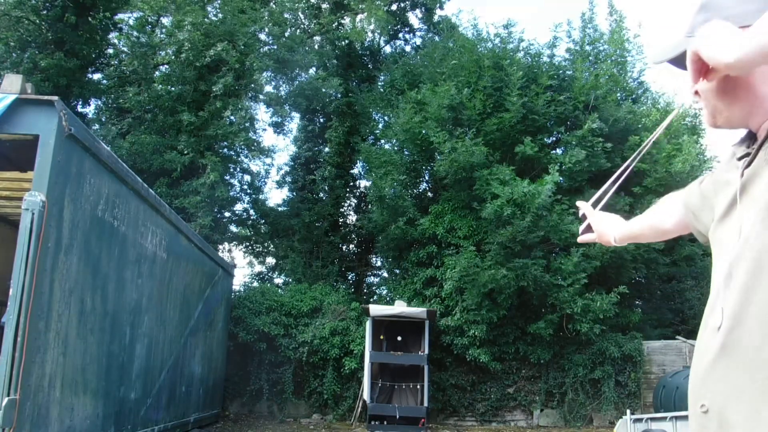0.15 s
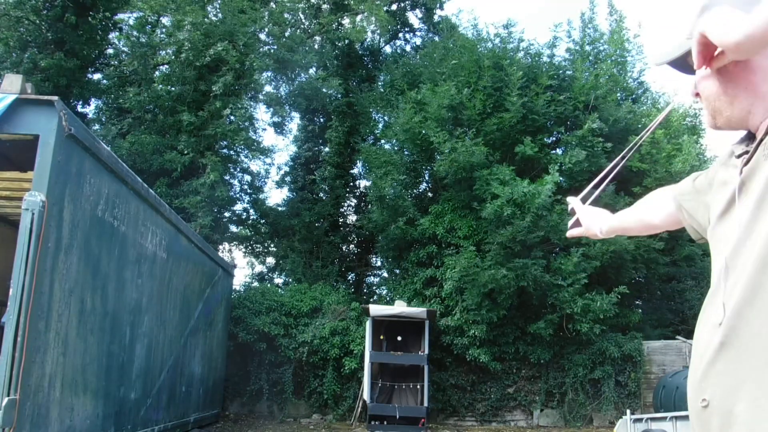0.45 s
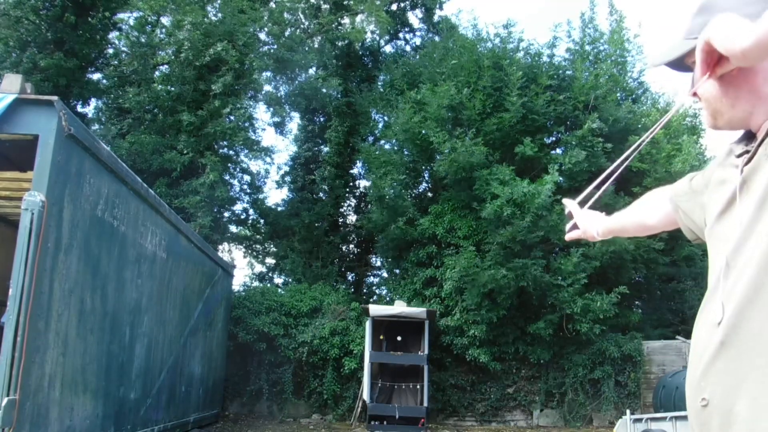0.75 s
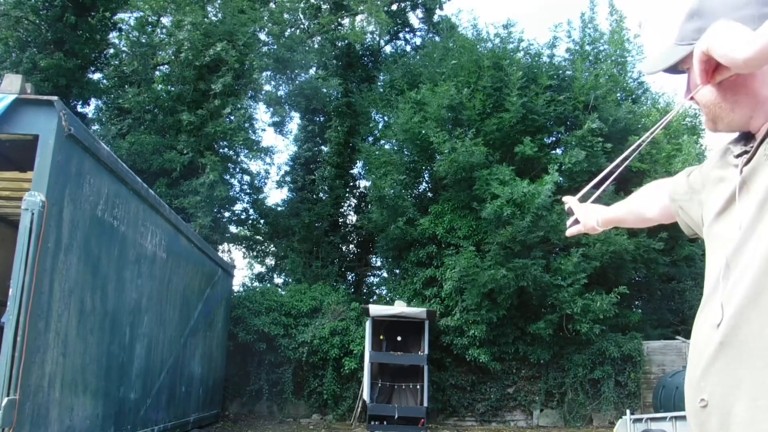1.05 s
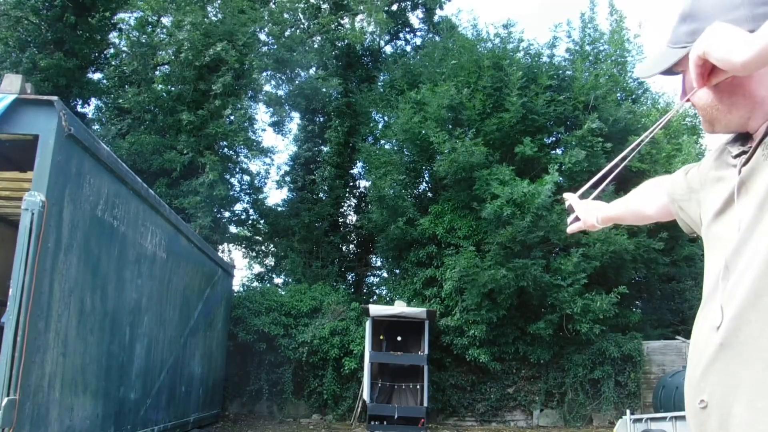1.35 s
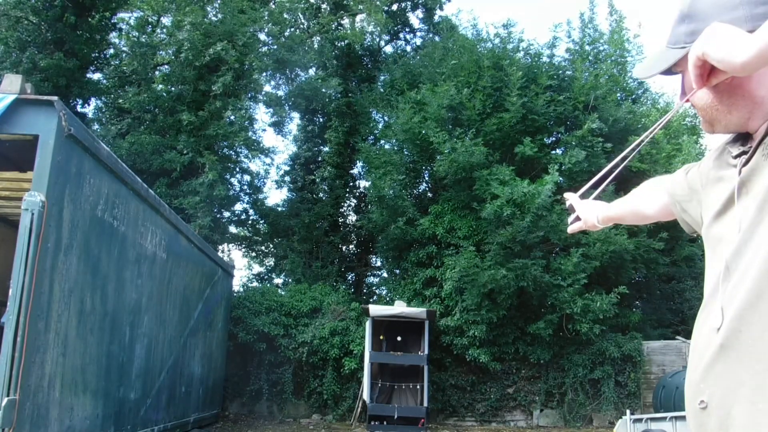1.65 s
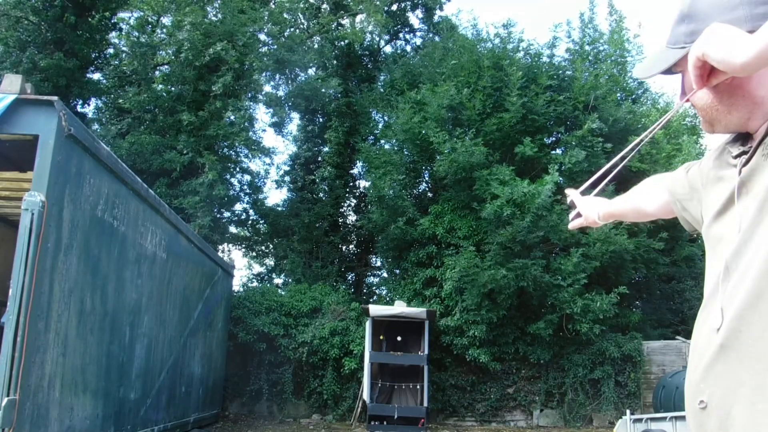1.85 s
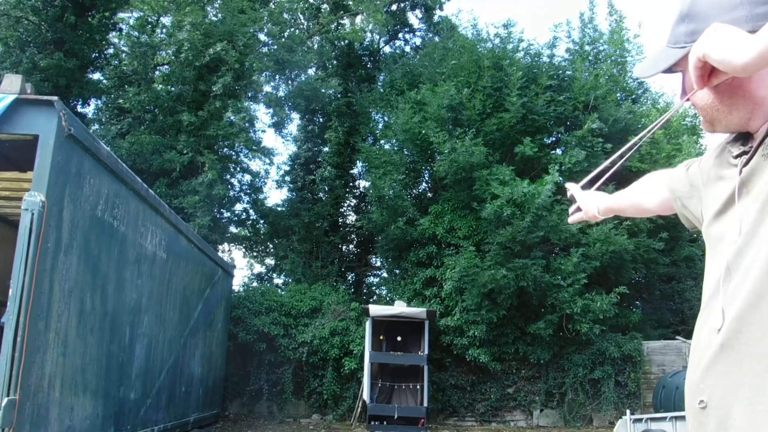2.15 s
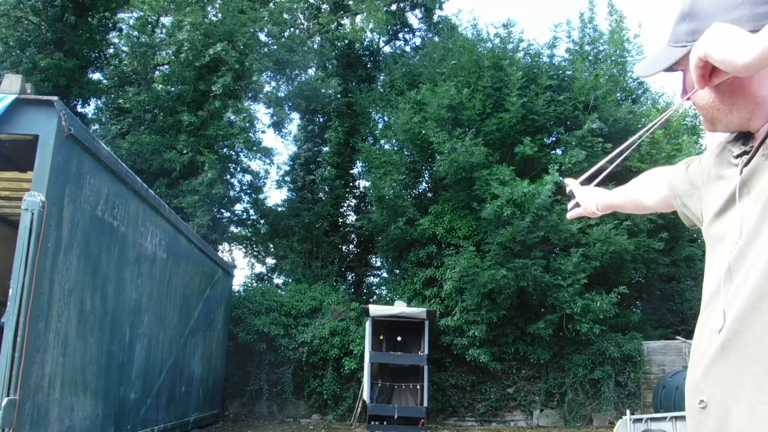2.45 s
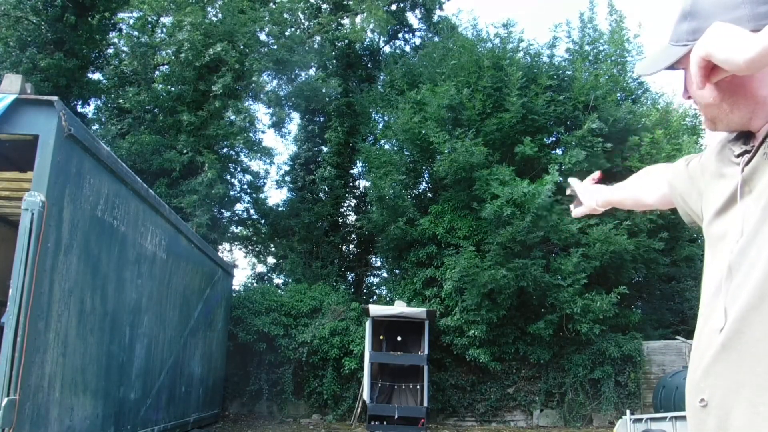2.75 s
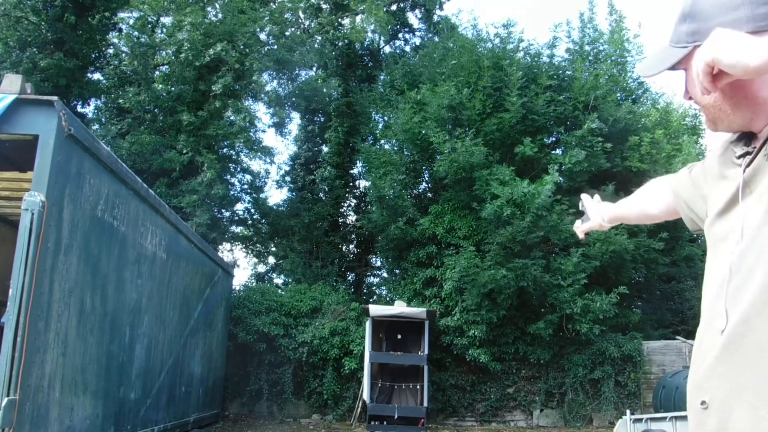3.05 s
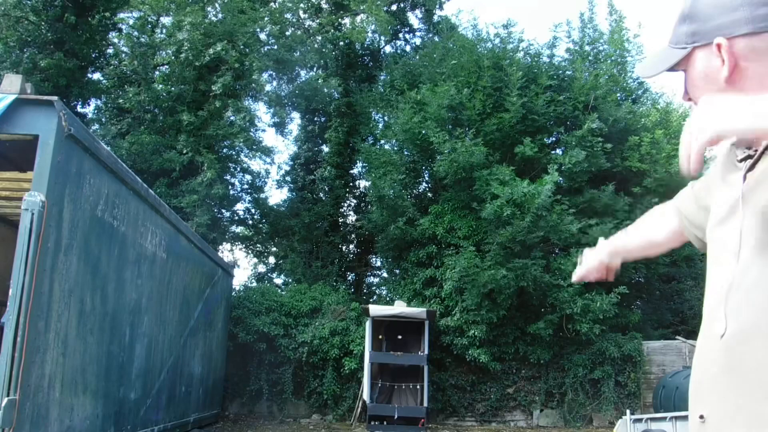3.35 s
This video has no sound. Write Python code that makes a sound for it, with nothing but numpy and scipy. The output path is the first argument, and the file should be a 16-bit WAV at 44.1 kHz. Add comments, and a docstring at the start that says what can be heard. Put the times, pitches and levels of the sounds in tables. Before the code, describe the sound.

Slingshot shot with a sharp snap, a hit and a ringing clank, amid garden birdsong.

```python
"""Slingshot in a garden

The drawn slingshot ticks; its bands crack and flutter. The steel ball smacks into a catch box, then
drops and rings it. A container wall and trees echo the blows, which overload the microphone.
A small bird chirps throughout in rustling trees, over a faint whir, whine and rumble."""
import sys
import numpy as np
from scipy import signal
from scipy.fft import rfft, irfft
from scipy.io import wavfile
from scipy.ndimage import uniform_filter1d

SR = 44100
rng = np.random.default_rng(int(sys.argv[2]) if len(sys.argv) > 2 else 0)


def file_out(sig):
    """Save sig as 16-bit WAV at sys.argv[1]."""
    # one column per channel
    cols = np.atleast_2d(sig).T
    # limit, then scale
    lim = np.clip(cols, -1, 1)
    pcm = np.round(lim * 32767).astype(np.int16)
    wavfile.write(sys.argv[1], SR, pcm)


N = 154350
T = np.arange(N) / SR


def undb(db):
    """Decibels to gain."""
    return 10 ** (np.asarray(db) / 20)


def unit(x):
    """Scale to rms 1."""
    return x / np.sqrt(np.mean(x ** 2) + 1e-20)


def curve(points):
    """Gain along (time [s], level [dB]) points, silent outside them."""
    return undb(np.interp(T, *np.array(points).T, left=-200, right=-200))


def colour(x, points):
    """Minimum-phase filter through (frequency [Hz], gain [dB]) points."""
    hz, db = np.array(points).T
    size = 4096
    bins_hz = np.maximum(np.arange(size // 2 + 1) * SR / size, 1)
    cepstrum = irfft(np.log(undb(np.interp(np.log(bins_hz), np.log(hz), db))))
    cepstrum[1:size // 2] *= 2
    cepstrum[size // 2 + 1:] = 0
    return signal.fftconvolve(x, irfft(np.exp(rfft(cepstrum))))[:N]


def lowpass(x, hz, order=2):
    """Butterworth low-pass."""
    return signal.sosfilt(signal.butter(order, hz, fs=SR, output="sos"), x)


def band(hz, width_hz):
    """Noise passed twice through one resonance, rms 1."""
    b, a = signal.iirpeak(hz, hz / width_hz, fs=SR)
    return unit(signal.lfilter(b, a, signal.lfilter(b, a, rng.standard_normal(N))))


def walk(rate_hz):
    """Smooth random drift, rms 1."""
    hold = int(SR / rate_hz)
    steps = np.repeat(rng.standard_normal(N // hold + 1), hold)[:N]
    return unit(uniform_filter1d(steps, hold))


def fade(start_s, t60_s):
    """Sudden onset, exponential decay."""
    return (T >= start_s) * undb(-60 * np.maximum(T - start_s, 0) / t60_s)


def bursts(contacts, spectrum):
    """Short contacts exciting dense, damped resonances, as decaying noise."""
    out = 0
    for start_s, db, t60_s in contacts:
        envelope = fade(start_s, t60_s)
        burst = unit(colour(envelope * rng.choice([-1., 1.], N), spectrum))
        out = out + undb(db) * np.sqrt(np.mean(envelope ** 2)) * burst
    return out


def swell(centre_s, half_width_s, db):
    """Gaussian gain envelope."""
    return undb(db) * np.exp(-((T - centre_s) / half_width_s) ** 2)


def garden():
    """Steady leaf noise with soft swells of rumble, hiss and rustle."""
    # leaf noise spectrum (frequency [Hz], gain [dB])
    leaf_colour = [(15, -33), (25, -9), (64, -9.5), (117, -15), (476, -12.5), (624, -10), (796, -9.5),
                   (936, -9), (1100, -9), (1440, -5.5), (1890, -12.5), (3920, -9), (4370, -6.5),
                   (6920, -17), (8140, -23.5), (9570, -24), (16000, -30)]
    # low rumbles (time [s], half width [s], level [dB])
    rumbles = [(.22, 0.17, -62), (.7, 0.14, -62), (1.025, .025, -57.5), (3.12, 0.032, -62)]
    # high hisses (time [s], half width [s], level [dB])
    hisses = [(.67, 0.049, -62), (1.65, .04, -63), (2.71, .05, -63)]
    # midrange rustles (time [s], half width [s], level [dB], frequency [Hz])
    rustles = [(.4, 0.091, -58.5, 2050), (.9, 0.16, -54.5, 3970)]
    leaves = unit(colour(rng.standard_normal(N), leaf_colour)) * undb(-50.5 + 0.21 * walk(4.95))
    rumble = band(120, width_hz=200) * sum(swell(*row) for row in rumbles)
    hiss = band(10000, width_hz=7000) * sum(swell(*row) for row in hisses)
    rustle = sum(swell(*shape) * band(hz, hz * 0.35) for *shape, hz in rustles)
    return leaves + rumble + hiss + rustle


def whir():
    """Distant whir: wavering narrow-band noise."""
    # whir envelope (time [s], level [dB])
    levels = [(0, -64), (.2, -57), (.8, -58), (1.3, -55), (1.5, -60.5), (2.1, -61.5), (2.7, -63),
              (3.5, -72)]
    return band(1422, width_hz=183) * curve(levels) * undb(0.58 * walk(25.44))


def whine():
    """Thin, steady tones with slight pitch drift."""
    # whine tones (frequency [Hz], rms level [dB])
    tones = [(6845, -73.5), (6905, -71), (7420, -77)]
    return sum(undb(db) * np.sqrt(2) * np.sin(2 * np.pi * np.cumsum(hz + 6 * walk(30)) / SR)
               for hz, db in tones)


def bird():
    """Buzzy, slightly falling chirps, each blurred differently by moving leaves."""
    # bird chirps (time [s], length [s], level [dB], pitch [Hz])
    chirps = [(-.03, 0.044, -43, 5294), (0.194, 0.056, -43.5, 5370), (0.588, 0.046, -45, 5470),
              (.625, 0.076, -48.5, 4850), (0.764, 0.055, -44.5, 5330), (.80, .1, -49.5, 4840),
              (.938, 0.058, -44.5, 5320), (0.973, 0.051, -50.5, 4800), (1.103, 0.062, -45, 5550),
              (1.379, 0.061, -48, 5250), (1.664, 0.064, -45.5, 5500), (1.846, 0.046, -43.5, 5260),
              (2.027, 0.056, -44.5, 5360), (2.238, .06, -45, 5400), (2.475, .05, -45, 5050),
              (2.755, 0.06, -43.5, 5200), (3.235, 0.07, -48.5, 5430), (3.457, .05, -46, 5380)]
    trill_hz, depth_hz, wander_hz, fall_hz = 170.5, 660, 209.5, 150
    direct_gain, blur_t60_s = 0.58, 0.43
    trill = np.sin(2 * np.pi * np.cumsum(trill_hz * (1 + .25 * walk(200))) / SR)
    waver_hz = depth_hz * trill + wander_hz * walk(300)
    size = SR // 3
    t = T[:size]
    song = 0
    for k, (start_s, length_s, db, hz) in enumerate(chirps):
        progress = np.clip(t / length_s, 0, 1)
        pitch_hz = hz + waver_hz[k * size // 2:][:size] + fall_hz * (.5 - progress)
        envelope = np.minimum(1, np.minimum(20 * progress, 2 * (1 - progress)))
        chirp = np.sqrt(2) * envelope * np.sin(2 * np.pi * np.cumsum(pitch_hz) / SR)
        blur = unit(rng.standard_normal(size) * undb(-60 * t / blur_t60_s)) / np.sqrt(size)
        heard = direct_gain * chirp + signal.fftconvolve(chirp, blur)[:size]
        song = song + undb(db) * np.interp(T - start_s, t, heard, left=0, right=0)
    return lowpass(song, hz=6270, order=20)


def draw_ticks():
    """The drawn slingshot clicks faintly."""
    # clicks (time [s], level [dB], t60 [s], frequency [Hz])
    ticks = [(.683, -43, 0.057, 2220), (1.038, -26, 0.0057, 4400), (1.0405, -36, .005, 4000)]
    clicks = sum(undb(db) * fade(start_s, t60_s) * band(hz, hz * 0.76) for start_s, db, t60_s, hz in ticks)
    return lowpass(clicks, hz=5750, order=6)


def band_release():
    """The bands crack like a whip and flap as they go slack."""
    # band cracks (time [s], level [dB], t60 [s])
    cracks = [(2.7998, 4, 0.0029), (2.8142, -6, 0.0049), (2.8153, -1.5, 0.0039), (2.8219, 10.5, 0.0047),
              (2.8261, -2.5, .005), (2.8383, -8.5, 0.0078), (2.8452, -9, 0.0054)]
    # crack spectrum (frequency [Hz], gain [dB])
    crack_colour = [(100, -33), (900, -28.5), (1500, -21.5), (3200, -22.5), (4700, -1.5), (5900, -6.5),
                    (8000, -21), (11000, -32), (16000, -48.5)]
    # flapping rubber spectrum (frequency [Hz], gain [dB])
    rubber_colour = [(60, -28), (300, -23), (800, -9.5), (1600, -5), (2600, -2.5), (3400, -5.5),
                     (4800, 0.5), (7000, -3), (10000, -17), (12000, -17), (16000, -30)]
    # flapping envelope (time [s], level [dB])
    flutter = [(2.797, -42), (2.804, -30), (2.811, -27), (2.818, -14.5), (2.829, -21), (2.839, -16.5),
               (2.846, -36), (2.856, -53), (2.88, -72)]
    rubber = unit(colour(rng.standard_normal(N), rubber_colour))
    flaps = rubber * undb(4.5 * walk(rate_hz=980)) * curve(flutter)
    return bursts(cracks, crack_colour) + flaps


def shooter_foliage(shot):
    """Leaves scatter the shot into a diffuse tail."""
    # scatter envelope (delay [s], level [dB])
    tail = [(.003, 4.5), (.045, -10), (.062, 0.5), (.09, -9), (.16, -18.5), (.35, -36), (.8, -43)]
    # scatter spectrum (frequency [Hz], gain [dB])
    tail_colour = [(100, -4), (700, -5), (1500, -2), (3000, 3), (4800, -2.5), (7000, -4), (10000, -0.5),
                   (16000, -18.5)]
    response = colour(rng.standard_normal(N) * curve(tail), tail_colour)
    return undb(-19.5) * signal.fftconvolve(shot, unit(response) / np.sqrt(N))[:N]


def ball_strike():
    """The ball smacks into the box. Returns sound and onset [s]."""
    # ball impacts (time [s], level [dB], t60 [s])
    strikes = [(2.9657, 1, 0.015), (2.9686, 1.5, 0.014), (2.9720, -5, 0.014)]
    # impact spectrum (frequency [Hz], gain [dB])
    strike_colour = [(60, -44), (250, -33), (600, -31.5), (1000, -24), (1400, -12), (2200, -7.5),
                     (3600, -0.5), (4600, -3.5), (5800, -14), (8000, -20), (11000, -27), (16000, -34)]
    return bursts(strikes, strike_colour), strikes[0][0]


def box_foliage(start_s):
    """Leaves scatter one blow on the box into a noise tail; the treble dies first."""
    # scatter envelope (delay [s], level [dB])
    tail = [(.004, 6), (.012, 12), (.028, 8.5), (.045, 0.5), (.13, -3.5), (.2, -6), (.26, -11.5), (.8, -47)]
    # scatter spectrum (frequency [Hz], gain [dB])
    tail_colour = [(100, -26.5), (600, -23), (1000, -15.5), (1400, -10), (2200, -5.5), (3300, 0),
                   (4700, -1.5), (6000, -10), (8000, -15.5), (11000, -29), (16000, -47)]
    split_hz, treble_loss_db_per_s = 6400, 57
    noise = unit(colour(rng.standard_normal(N), tail_colour))
    low = lowpass(lowpass(noise, split_hz)[::-1], split_hz)[::-1]  # zero phase
    age_s = np.maximum(T - start_s, 0)
    treble = (noise - low) * undb(-treble_loss_db_per_s * age_s)
    return (low + treble) * np.interp(age_s, T, curve(tail))


def wall_echoes(strike, drop):
    """Nearby walls return delayed, filtered copies of both blows."""
    # reflections (delay [s], strike gain [dB], drop gain [dB])
    echoes = [(.0155, -25, -22), (.031, -30, -17), (.047, -30, -33), (.1, -22, -32)]
    # wall response (frequency [Hz], gain [dB])
    wall_colour = [(100, -26), (600, -10), (1500, 2), (5000, -2.5), (9000, -9), (16000, -28)]
    copies = sum(np.interp(T - delay_s, T, undb(strike_db) * strike + undb(drop_db) * drop, left=0)
                 for delay_s, strike_db, drop_db in echoes)
    return colour(copies, wall_colour)


def ball_drop():
    """The ball drops and rings the box. Returns sound and onset [s]."""
    # landing contacts (time [s], level [dB], t60 [s])
    knocks = [(3.2882, -9.5, 0.034), (3.2916, -11, 0.032), (3.295, -14, 0.026)]
    # contact spectrum (frequency [Hz], gain [dB])
    knock_colour = [(60, -46), (400, -39), (900, -17), (1800, -7.5), (2600, 2.5), (4000, -0.5), (5200, -6),
                    (6800, -17), (9000, -39), (16000, -59)]
    # box modes (frequency [Hz], relative level [dB], t60 [s])
    modes = [(456, -27.5, 0.15), (871, -13, 0.1), (1285, -0.5, 0.071), (1710, -2, 0.033), (1950, -6, .035),
             (2344, 0, 0.031), (2510, 9, 0.021), (3000, 4, 0.071), (3310, 2, .05), (3680, -18, .045),
             (3960, 3, 0.054), (4530, -3.5, 0.15), (5080, -6.5, 0.067)]
    start_s, rise_s = knocks[0][0], .0015
    age_s = T - start_s
    ring = sum((-1) ** k * undb(db) * fade(start_s, t60_s) * np.sin(2 * np.pi * hz * age_s)
               for k, (hz, db, t60_s) in enumerate(modes))
    ring = lowpass(ring * np.clip(age_s / rise_s, 0, 1), hz=6630, order=4)
    return bursts(knocks, knock_colour) + undb(-20) * ring, start_s


def scene():
    """Mono mix at the microphone."""
    shot = band_release()
    slingshot = draw_ticks() + shot + shooter_foliage(shot)
    strike, strike_s = ball_strike()
    drop, drop_s = ball_drop()
    strike_tail = undb(-32) * box_foliage(strike_s)
    drop_tail = undb(-37) * lowpass(box_foliage(drop_s), hz=6500, order=4)
    catch_box = strike + strike_tail + drop + drop_tail + wall_echoes(strike, drop)
    return (slingshot + catch_box + bird() + garden() + whir() + whine())[None]


def record(dry):
    """The loudest peaks clip; deep bass and top treble are cut."""
    bass_cut = signal.butter(1, 55, "high", fs=SR, output="sos")
    top_cut = signal.ellip(8, .2, 70, 16400, fs=SR, output="sos")
    clipped = np.clip(dry, -.95, .95)
    return signal.sosfilt(top_cut, signal.sosfilt(bass_cut, clipped))


dry = scene()
out = record(dry)
file_out(out)
```